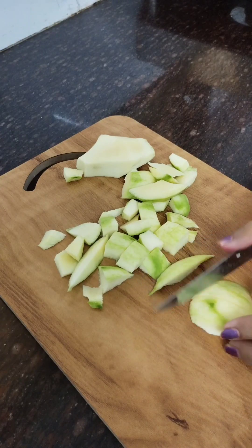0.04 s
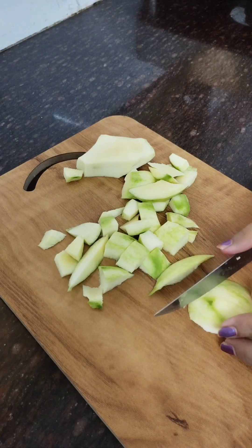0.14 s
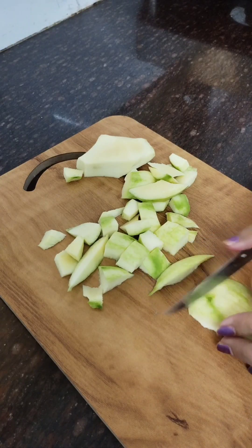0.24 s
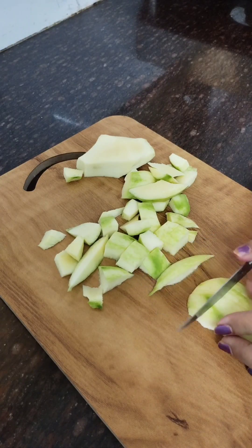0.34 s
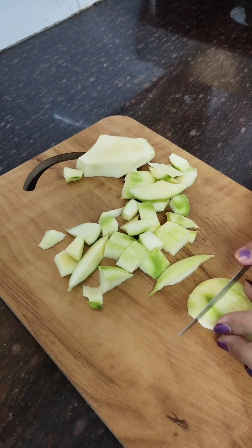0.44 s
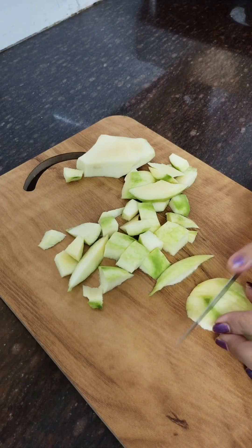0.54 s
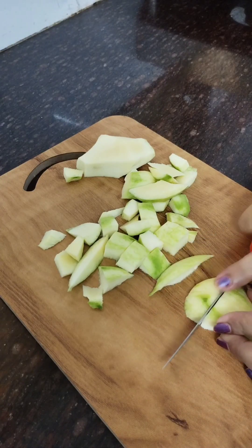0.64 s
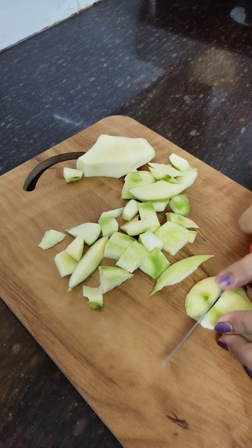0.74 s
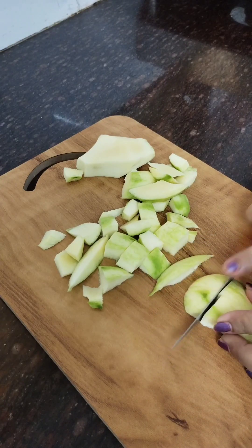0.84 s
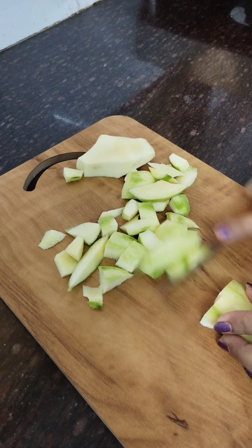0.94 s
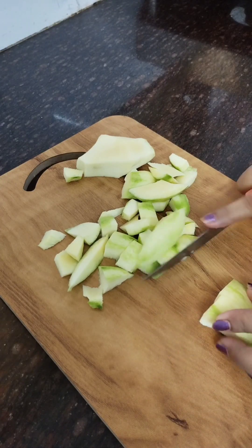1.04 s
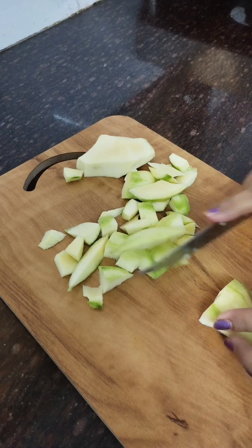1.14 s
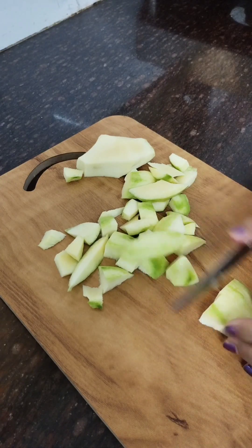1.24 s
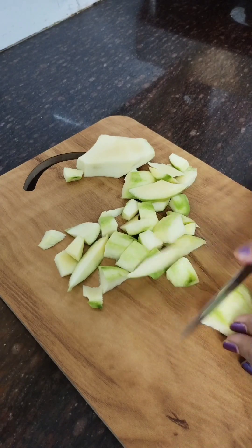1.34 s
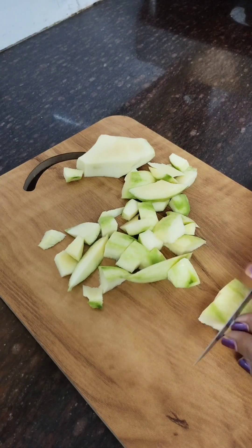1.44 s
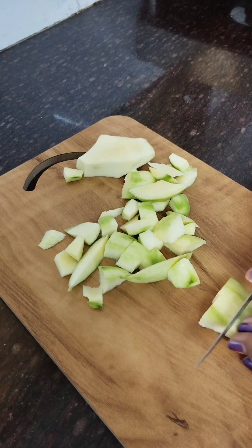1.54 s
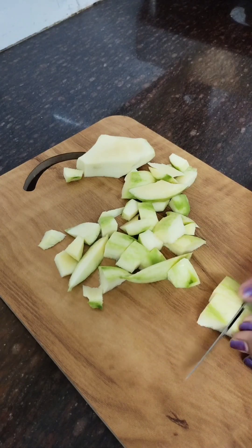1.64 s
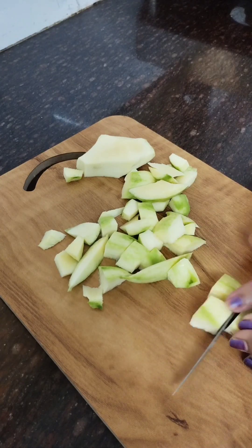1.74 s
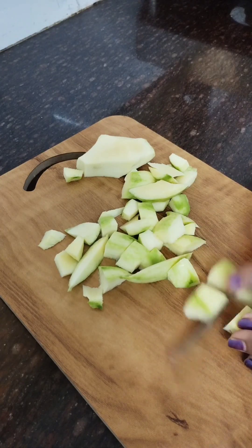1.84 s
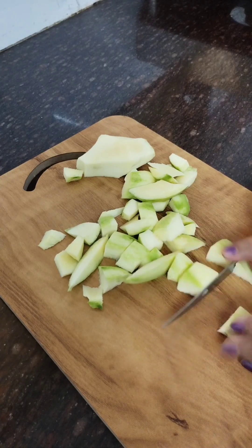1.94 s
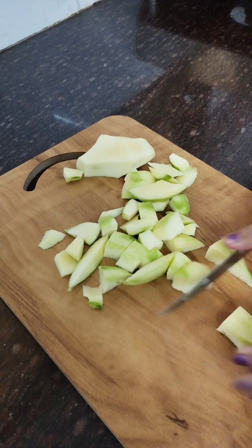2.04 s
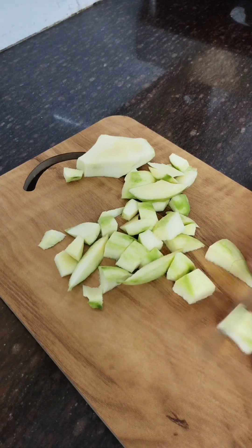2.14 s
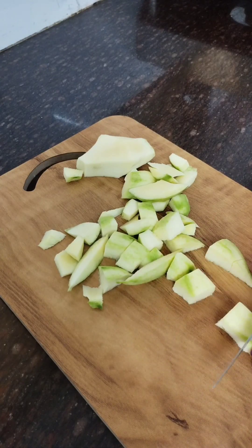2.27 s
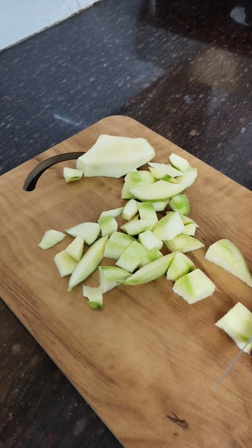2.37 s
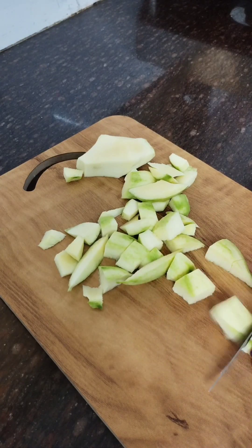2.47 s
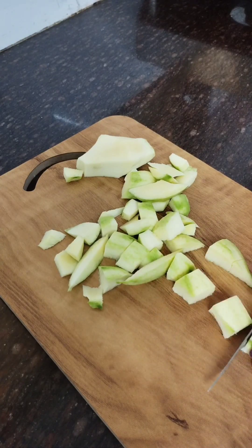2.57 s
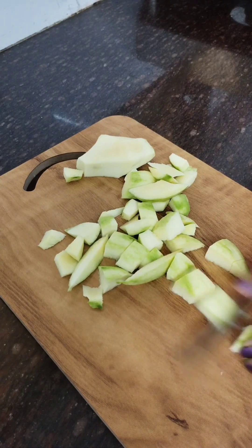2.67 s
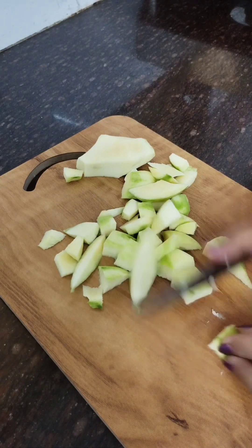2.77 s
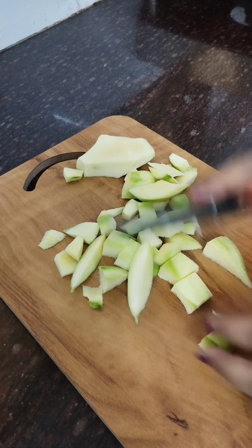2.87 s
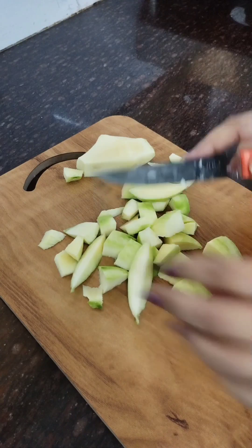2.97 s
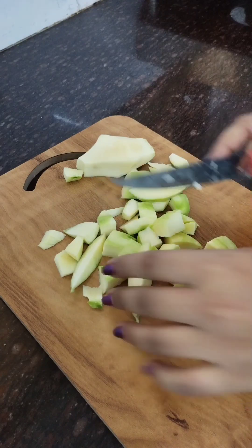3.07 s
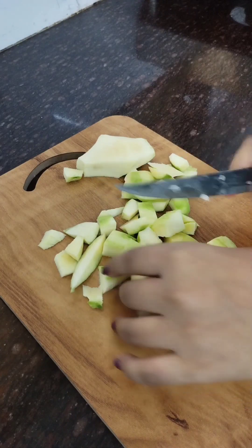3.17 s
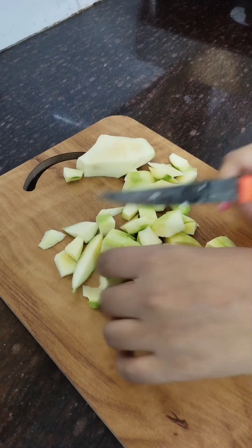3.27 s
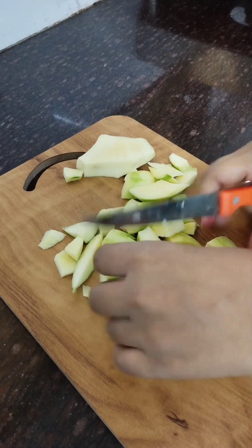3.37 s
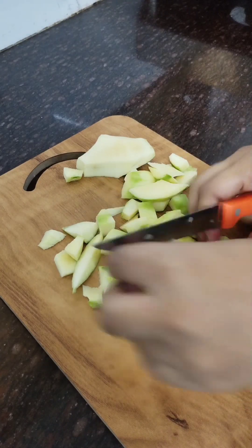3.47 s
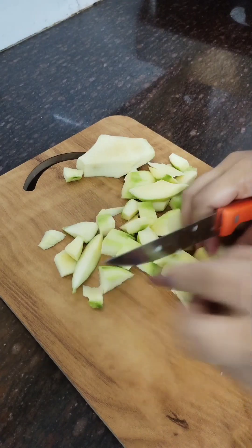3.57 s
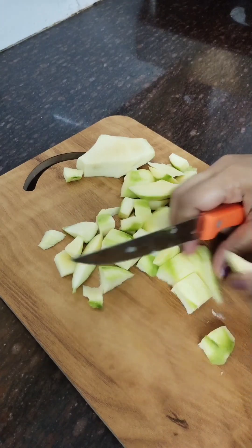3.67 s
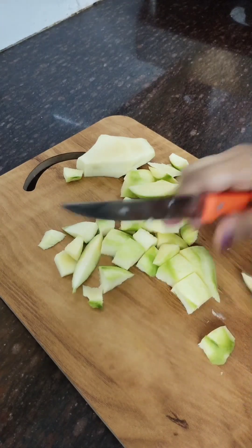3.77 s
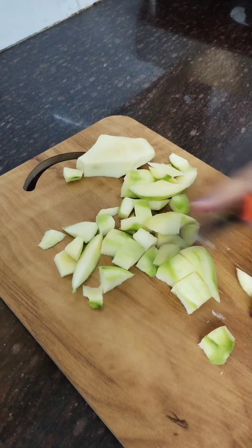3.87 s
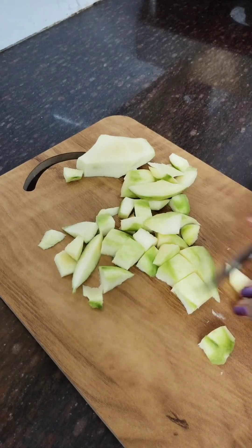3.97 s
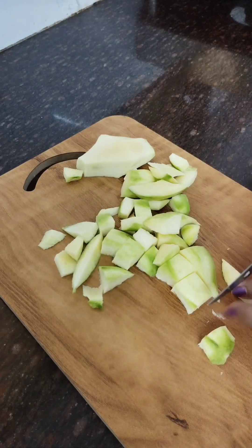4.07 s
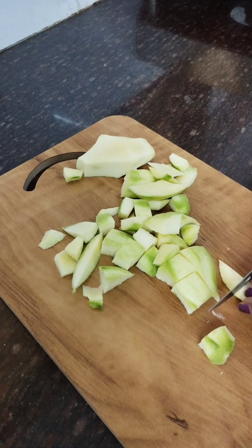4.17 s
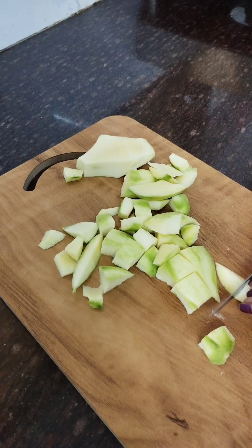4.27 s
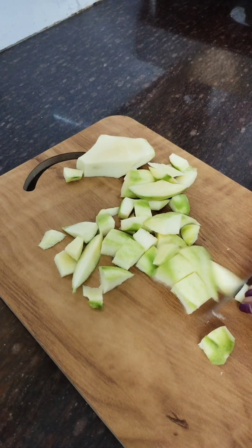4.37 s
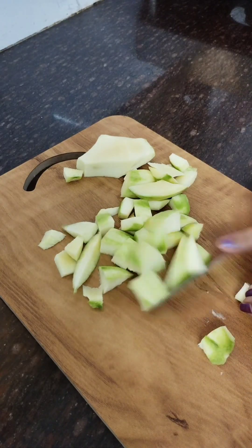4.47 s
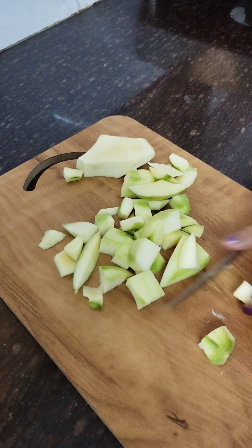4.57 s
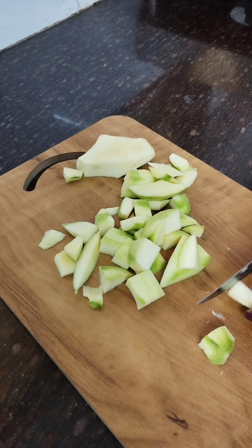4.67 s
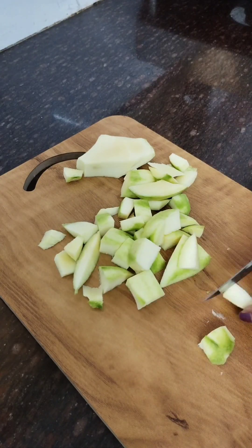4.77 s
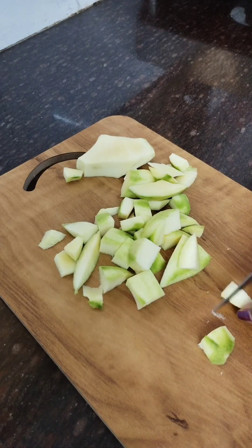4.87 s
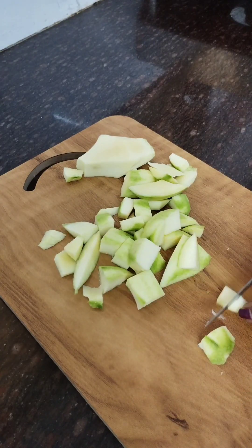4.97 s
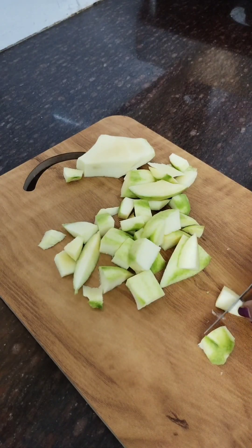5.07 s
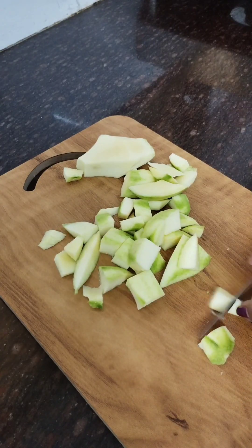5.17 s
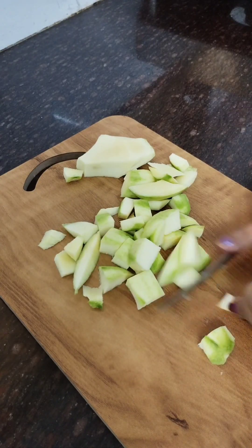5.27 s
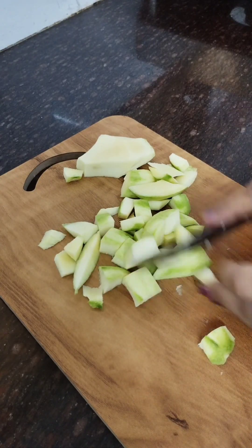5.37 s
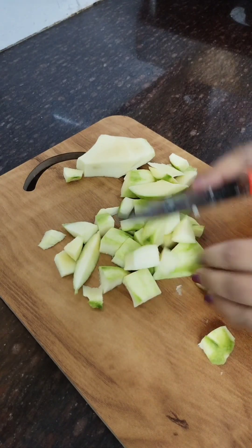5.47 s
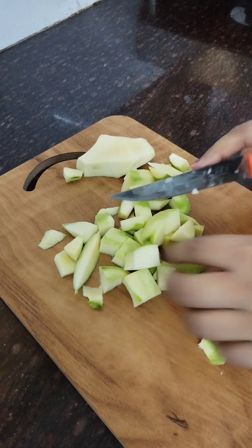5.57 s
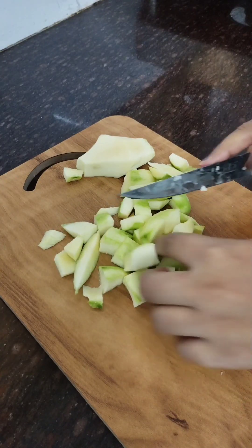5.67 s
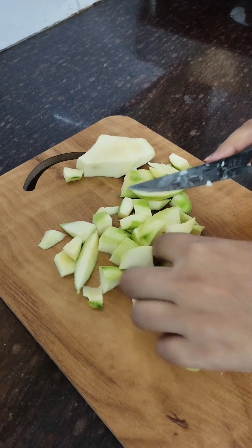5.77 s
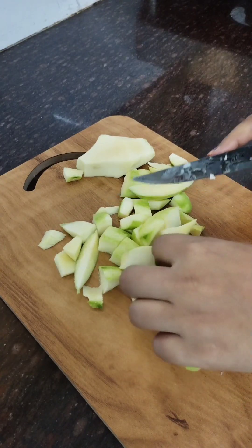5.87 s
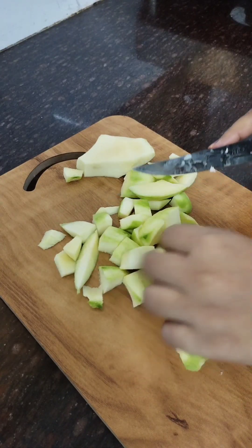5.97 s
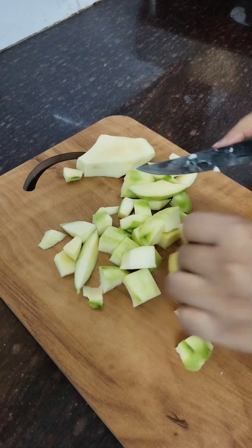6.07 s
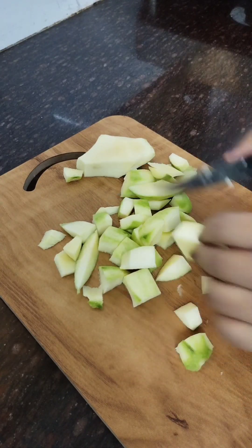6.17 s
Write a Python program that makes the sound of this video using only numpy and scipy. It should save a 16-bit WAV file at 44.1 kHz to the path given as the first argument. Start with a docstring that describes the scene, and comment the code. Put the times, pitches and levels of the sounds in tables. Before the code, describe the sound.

Close, unhurried cutting of hard fruit: brief crunches, four sharp knife knocks on wood and short scrapes, with a little room ring.

```python
"""Cutting green mango

A kitchen knife cuts hard green mango on a wooden board in a bare, tiled kitchen. The flesh
crunches and gives way; the blade knocks on the board, then scrapes the piece aside. Knocks and
scrapes ring the same modes of blade and board. Wet pieces tick, hands bump, the board rumbles.
Hard knocks duck a limiter for a tenth of a second, so the room's ring jumps back up after them."""
import sys
import numpy as np
from scipy import signal
from scipy.fft import rfft, irfft, next_fast_len
from scipy.io import wavfile
from scipy.ndimage import uniform_filter1d, minimum_filter1d

SR = 44100
rng = np.random.default_rng(int(sys.argv[2]) if len(sys.argv) > 2 else 0)


def to_wav(s):
    """Save 16-bit WAV."""
    ch = np.atleast_2d(s).T  # columns
    pcm = np.round(np.clip(ch, -1, 1) * 32767)  # PCM
    wavfile.write(sys.argv[1], SR, pcm.astype(np.int16))


N = 274280
TIME = np.arange(N) / SR

# Blade hits board: (time [s], level over 5 ms [dB], contact [ms], rattle re click [dB],
# brightness [dB/oct], place [0 heel, 1 tip], room send [dB], air push [dB])
KNOCKS = [(0.6345, -4.5, 0.86, -15, 4.5, 0, -6.5, -30), (1.6654, 7.5, 1.8, -1.5, 3, 0, -5.5, 7),
          (2.5165, 9.5, 2.4, -1, 2.5, 0.005, -5.5, 7), (5.1432, -5.5, 1.01, -26, 1.5, 0.96, -7.5, -57.5)]


def knocks(click_tilt_db_oct=1.5, click_cut_hz=1200):
    """The edge lands with one click and rattles into the wood; returns direct sound and room feed."""
    direct, room_feed, t = np.zeros(N), np.zeros(N), TIME[:SR // 10]
    impulse = 1.0 * (t == 0)
    for start, db, contact_ms, rattle_db, brightness, place, room_db, _ in KNOCKS:
        gain = from_db(db) * np.sqrt(0.005 * SR)
        click = board(impulse, brightness + click_tilt_db_oct, place)
        click = unit_energy(butter(click, click_cut_hz, "high"))  # a narrow blade radiates little bass
        chatter = rng.standard_normal(len(t)) * np.exp(-1000 * t / contact_ms)
        rattle = unit_energy(board(chatter, brightness, place))
        add(direct, start, gain * unit_energy(click + from_db(rattle_db) * rattle))
        # the room gathers all directions, so it takes the modes evenly
        radiated = unit_energy(board(impulse, brightness, place))
        add(room_feed, start, gain * from_db(room_db) * radiated)
    return direct, room_feed


# Blade and board modes: (frequency [Hz], bandwidth [Hz], level at heel [dB], level at tip [dB])
MODES = [(815, 550, -30.5, -19), (1360, 222, 0.5, -0.5), (1990, 325, 0, 0), (2410, 304, 4.5, 8.5),
         (2634, 405, -9.5, 8), (3163, 380, -15, 3.5), (4270, 1130, -3.5, -10), (5260, 240, -3, 0.5),
         (6180, 1000, -6.5, -11), (8710, 1000, -7, -7), (10100, 2600, -19, -29), (13400, 5900, -38.5, -29)]


def board(force, brightness, place):
    """Force rings the modes of blade and board, weighted by contact place and brightness."""
    out = 0
    for k, (hz, width_hz, heel_db, tip_db) in enumerate(MODES):
        radius = np.exp(-np.pi * width_hz / SR)
        poles = [1, -2 * radius * np.cos(2 * np.pi * hz / SR), radius ** 2]
        mode = (1 - radius ** 2) / 2 * signal.lfilter([1, 0, -1], poles, force + 1e-18)
        db = heel_db + place * (tip_db - heel_db) + brightness * np.log2(hz / 2800)
        out = out + (-1) ** k * from_db(db) * mode
    return out


def air_pushes(rise_s=0.00033, recover_s=0.048):
    """Hard blows shove the microphone off centre; it swings back with one slow overshoot."""
    out, t = np.zeros(N), TIME[:SR]
    swing = (1 - np.exp(-t / rise_s)) * (t / recover_s - 1) * np.exp(-t / recover_s)
    for start, *_, push_db in KNOCKS:
        add(out, start, from_db(push_db) * swing)
    return out


# Cracks in the flesh: (time [s], length [s], level [dB], brightness [dB/oct])
CRUNCHES = [(0.5912, .0067, -28, -1), (0.603, .055, -30, 0.6), (1.635, .02, -28.5, 0.5),
            (2.471, .0063, -34, -1.5), (4.312, .008, -37, 1.5), (4.379, 0.006, -40.5, 0.5),
            (4.408, 0.0069, -36.5, -1.5), (5.064, 0.011, -42.5, 4), (5.102, .0065, -36.5, -2),
            (6.070, .0088, -45.5, -5.5)]
# Bursting cells: (frequency [Hz], relative density [dB])
FLESH_SPECTRUM = [(100, -5.5), (400, -11), (800, -3), (1400, 3), (2500, -7), (5000, -7.5), (8500, -0.5),
                  (12000, -11.5), (16000, -16)]


def crunches(fade_s=0.003, snap_contacts=1.7, snap_db=-21.5, snap_db_oct=-1.4):
    """Cells burst in dense runs as the crack travels; the last flesh snaps just before each knock."""
    out, t = np.zeros(N), TIME[:SR // 10]
    runs = list(CRUNCHES)
    for knock_s, db, contact_ms, *_ in KNOCKS:
        lead_s = snap_contacts * contact_ms / 1000
        runs.append((knock_s - lead_s, lead_s, db + snap_db, snap_db_oct))
    for start, length_s, db, brightness in runs:
        spectrum = [(hz, level + brightness * np.log2(hz)) for hz, level in FLESH_SPECTRUM]
        bursts = coloured(grains(per_s=2500, spread_db=3, size=len(t)), spectrum)
        # light cuts open slower: 1 ms at -29 dB, doubling per 7.5 dB less
        grow_s = 0.001 * 2 ** ((-29 - db) / 7.5)
        envelope = (1 - np.exp(-t / grow_s)) * np.exp(-np.maximum(t - length_s, 0) / fade_s)
        add(out, start, from_db(db) * bursts * envelope)
    return out


# Blade drags: (time [s], rise [s], hold [s], level [dB], brightness [dB/oct], place [0 heel, 1 tip])
SCRAPES = [(0.915, .012, .105, -22, -0.5, 0.87), (1.871, 0.049, .022, -24, -3, .2),
           (2.626, 0.0051, .115, -26.5, 3, .1), (4.412, 0.073, .036, -22, 0.5, 0.94),
           (4.573, 0.02, .012, -39, 2, .6), (5.240, 0.0091, 0.041, -20, -0.5, 0.9)]
# Wet hiss, shared with the ticks: (frequency [Hz], relative density [dB])
WET_SPECTRUM = [(500, -8.5), (2500, -0.5), (5500, -0.5), (10000, 2), (12500, -8), (16000, -5)]


def scrapes(rise_db=21.5, sag_db_per_s=65.5, lift_db_per_s=449, judder_db=2.5, fibre_db=-18):
    """The edge slips over the wood grain in tiny jumps; each stroke bites, eases off, then lifts."""
    out, t = np.zeros(N), TIME[:SR // 3]
    for start, rise_s, hold_s, db, peak_brightness, place in SCRAPES:
        pressure_db = (rise_db * np.minimum(t / rise_s - 1, 0)
                       - sag_db_per_s * np.maximum(t - rise_s, 0)
                       - lift_db_per_s * np.maximum(t - rise_s - hold_s, 0))
        # less pressure: duller, less hiss
        brightness = peak_brightness + 0.15 * np.maximum(pressure_db, -rise_db)
        slips = grains(per_s=4000, spread_db=0.5, size=len(t))
        slips *= from_db(judder_db * drift(per_s=250, size=len(t)))
        ring = unit_rms(board(slips, brightness, place))
        fibres = from_db(fibre_db) * unit_rms(butter(slips, [700, 1600], "band"))
        hiss = from_db(-13 + 2.5 * brightness) * coloured(slips, WET_SPECTRUM)
        add(out, start, (ring + fibres + hiss) * from_db(db + pressure_db))
    return out


# Pieces parting: (time [s], relative level [dB])
PARTINGS = [(0.344, -30), (0.5307, -27), (0.5474, -30), (0.8819, -27), (0.898, -28), (2.136, -35),
            (2.875, -31), (3.3286, -46), (3.8022, -38), (4.1939, -34.5)]
# Fingers gathering pieces: (centre [s], length [s], level [dB])
GATHERS = [(3.242, 0.19, -56.5), (3.646, 0.24, -61), (4.074, .09, -58), (4.322, 0.16, -59.5)]


def pieces(tick_db=-9, rise_s=0.0025, decay_s=0.0049):
    """Wet pieces tick as they part and rustle under the fingers."""
    t = TIME[:SR // 10]
    envelope = sum(swell(*row) for row in GATHERS)
    tick = (1 - np.exp(-t / rise_s)) * np.exp(-t / decay_s)
    for start, db in PARTINGS:
        add(envelope, start, from_db(db + tick_db) * tick)
    return envelope * coloured(grains(per_s=2800, spread_db=4.5), WET_SPECTRUM)


def juice_ticks(per_s=13, level_db=-46, range_db=12, decay_s=0.0004):
    """Juice films snap at random between the pieces."""
    snaps = (rng.random(N) < per_s / SR) * from_db(-range_db * rng.random(N))
    envelope = signal.lfilter([1], [1, -np.exp(-1 / (decay_s * SR))], snaps + 1e-18)
    return from_db(level_db) * envelope * coloured(rng.standard_normal(N), WET_SPECTRUM)


def squeak(centre_s=0.425, length_s=0.21, level_db=-58, centre_hz=3900, fall_hz_per_s=2300, rasp_hz=170):
    """Steel pressed into the tight cut gives a faint falling whistle."""
    hz = centre_hz - fall_hz_per_s * (TIME - centre_s) + rasp_hz * drift(per_s=570)
    gate = np.abs(TIME - centre_s) < length_s / 2
    return swell(centre_s, length_s, level_db) * sine(hz) * gate


# Blade pressed in the cut: (frequency [Hz], relative level [dB])
PRESSED_PARTIALS = [(2740, -8), (2870, -2.5), (3070, -2), (3190, -17), (3310, -4)]
# Blade lifted free: (frequency [Hz], relative level [dB])
LIFTED_PARTIALS = [(3600, 0.5), (4050, 4.5), (4450, 3.5), (5400, 2.5)]


def blade_ring(partials, shimmer_hz):
    """The steel rings in a few slightly unsteady partials."""
    return sum(from_db(db) * sine(hz + shimmer_hz * drift(per_s=220)) for hz, db in partials)


# Soft hand bumps: (time [s], level [dB], pitch [Hz])
BUMPS = [(3.954, -22.5, 63.6), (4.011, -20, 85)]


def hand_bumps(cycles=0.58, rebound_s=0.0173, loss_db=5):
    """Each bump is a low swing, gone in about a cycle, with two weaker rebounds."""
    out, t = np.zeros(N), TIME[:SR // 5]
    for start, db, hz in BUMPS:
        age = 2 * hz * t / cycles
        swing = np.sin(2 * np.pi * hz * t) * age * np.exp(1 - age)
        for k in range(3):
            add(out, start + k * rebound_s, from_db(db - k * loss_db) * swing)
    return out


# Hands leaning on the board: (centre [s], length [s], level [dB])
LEANS = [(2.25, 0.68, -39.5), (3.2, 0.64, -44), (4.6, 0.16, -41.5)]
# Board on counter: (frequency [Hz], relative density [dB])
RUMBLE_SPECTRUM = [(12, 8.5), (25, -2.5), (60, -5), (130, -21), (230, -17), (330, -38), (1000, -68.5)]


def board_rumble():
    """The board shudders on the counter as the hands lean on it."""
    return sum(swell(*row) for row in LEANS) * coloured(rng.standard_normal(N), RUMBLE_SPECTRUM)


# Kitchen decay: (frequency [Hz], T60 [s])
ROOM_T60 = [(200, 2), (1400, 0.5946), (2500, 0.5949), (5000, 0.4566), (9000, 0.3826), (15000, 0.4449)]
# Kitchen tail colour: (frequency [Hz], relative level [dB])
ROOM_COLOUR = [(200, -1), (750, -9.5), (1400, 4.5), (2500, -0.5), (5000, 1.5), (9000, 0.5), (12000, 3),
               (15000, -2.5)]


def kitchen(x, build_s=0.0012, echo_s=0.0112, echo_db=-7, echo_cut_hz=5000):
    """One strong reflection off the tiles and a diffuse tail whose bass lasts longest."""
    t = TIME[:SR]
    white, tail = rng.standard_normal((2, SR)), 0
    edges_hz = np.geomspace(100, 18000, 14)
    for k, (low, high) in enumerate(zip(edges_hz, edges_hz[1:])):
        hz = np.sqrt(low * high)
        band = butter(white[k % 2], [low, high], "band")
        fade = np.exp(-np.log(1000) * t / at_hz(ROOM_T60, hz))
        tail = tail + band * from_db(at_hz(ROOM_COLOUR, hz)) * fade
    tail = unit_energy(tail * (1 - np.exp(-t / build_s)))
    echo = unit_energy(butter(np.arange(SR) == int(echo_s * SR), echo_cut_hz, "low"))
    return signal.fftconvolve(x, tail + from_db(echo_db) * echo)[:N]


# Room tone: (frequency [Hz], relative density [dB])
ROOM_TONE = [(12, -35), (20, -1), (50, -7), (77, -12), (168, -3), (277, -13), (399, -9), (513, -13.5),
             (558, -20), (607, -16.5), (1190, -17.5), (3250, -34), (6910, -38.5), (8650, -32),
             (16000, -49.5)]


def background(tone_db=-49.5, hum_hz=106.6, drone_band_hz=(73, 207)):
    """Steady room tone; at the start, a brief low hum and a drone that outlasts it."""
    hum = unit_rms(sine(hum_hz + 3 * drift(per_s=32)))
    tone = from_db(tone_db) * coloured(rng.standard_normal(N), ROOM_TONE)
    drone = unit_rms(butter(rng.standard_normal(N), drone_band_hz, "band"))
    hum *= swell(centre_s=0.23, length_s=0.68, db=-47.5)
    drone *= swell(centre_s=0.78, length_s=1, db=-48.5)
    return hum + tone + drone


def from_db(db):
    """Decibels to gain."""
    return 10 ** (np.asarray(db) / 20)


def unit_rms(x):
    """Scale to rms 1."""
    return x / np.sqrt(np.mean(x ** 2) + 1e-20)


def unit_energy(x):
    """Scale to a summed square of 1."""
    return x / np.sqrt(np.sum(x ** 2) + 1e-20)


def at_hz(points, hz):
    """Read a table on a log-frequency axis."""
    known_hz, values = np.transpose(points)
    return np.interp(np.log(np.maximum(hz, 1)), np.log(known_hz), values)


def add(out, start_s, sound):
    """Mix a sound in at start_s."""
    at = max(int(round(start_s * SR)), 0)
    out[at:at + len(sound)] += sound[:N - at]


def coloured(x, spectrum):
    """Shape by a spectrum table; rms 1."""
    size = next_fast_len(len(x))
    gain = from_db(at_hz(spectrum, np.fft.rfftfreq(size, 1 / SR)))
    return unit_rms(irfft(rfft(x, size) * gain, size)[:len(x)])


def butter(x, hz, kind):
    """Causal Butterworth filter."""
    return signal.sosfilt(signal.butter(2, hz, kind, fs=SR, output="sos"), x + 1e-18)


def sine(hz):
    """Sine following a pitch curve."""
    return np.sin(2 * np.pi * np.cumsum(hz) / SR)


def drift(per_s, size=N):
    """Random wander; rms 1."""
    knots = rng.standard_normal(4096)
    return unit_rms(np.interp(np.arange(size) / SR * per_s, np.arange(len(knots)), knots))


def grains(per_s, spread_db, size=N):
    """Random clicks of uneven strength; rms 1."""
    strength = from_db(spread_db * np.minimum(rng.exponential(1, size), 4))
    clicks = rng.random(size) < per_s / SR
    return unit_rms(clicks * strength * rng.choice([-1, 1], size))


def swell(centre_s, length_s, db, edge_db=8):
    """Bell-shaped gain, edge_db down at both ends of its length."""
    return from_db(db - edge_db * np.minimum((2 * (TIME - centre_s) / length_s) ** 2, 20))


def limiter(x, block=973, offset=943, ramp=81):
    """Gain drops to hold a peak at full scale and ramps back after five 22 ms blocks; sizes in samples."""
    padded = np.pad(x, (offset, -(N + offset) % block))
    needed = 1 / np.maximum(np.abs(padded), 1).reshape(-1, block)
    held = np.min([np.roll(needed.min(axis=1), k) for k in range(1, 5)], axis=0)
    gain = np.minimum(np.minimum.accumulate(needed, axis=1), held[:, None])
    gain = gain.ravel()[offset:offset + N]
    return x * uniform_filter1d(minimum_filter1d(gain, ramp), ramp)


def scene(scrape_room_db=-7.5, cutting_room_db=-8):
    """Close knife and fruit sounds feed the kitchen; the low sounds stay dry. Mono."""
    hits, hit_feed = knocks()
    drags = scrapes()
    cutting = crunches() + pieces() + juice_ticks() + squeak()
    cutting += blade_ring(PRESSED_PARTIALS, shimmer_hz=30) * swell(centre_s=0.14, length_s=0.27, db=-62)
    cutting += blade_ring(LIFTED_PARTIALS, shimmer_hz=25) * swell(centre_s=2.6, length_s=0.19, db=-63)
    room = kitchen(hit_feed + from_db(scrape_room_db) * drags + from_db(cutting_room_db) * cutting)
    lows = air_pushes() + hand_bumps() + board_rumble()
    return (hits + drags + cutting + room + lows + background())[None]


def record(dry, overload_db=17, cutoff_hz=16000):
    """Soft microphone overload, limiter, steep low-pass."""
    ceiling = from_db(overload_db)
    limited = limiter(ceiling * np.tanh(dry[0] / ceiling))
    lowpass = signal.ellip(12, 0.1, 80, cutoff_hz, fs=SR, output="sos")
    return signal.sosfilt(lowpass, limited)[None]


dry = scene()
out = record(dry)
to_wav(out)
```